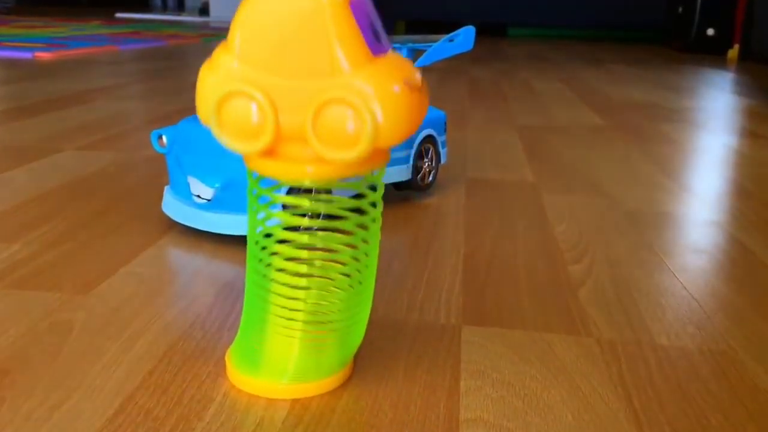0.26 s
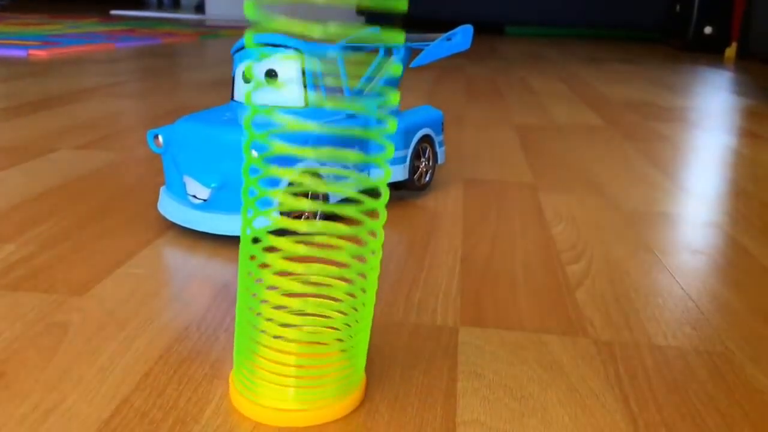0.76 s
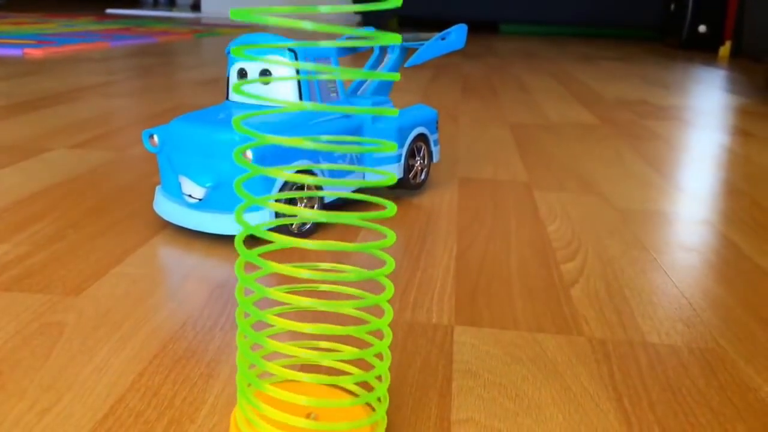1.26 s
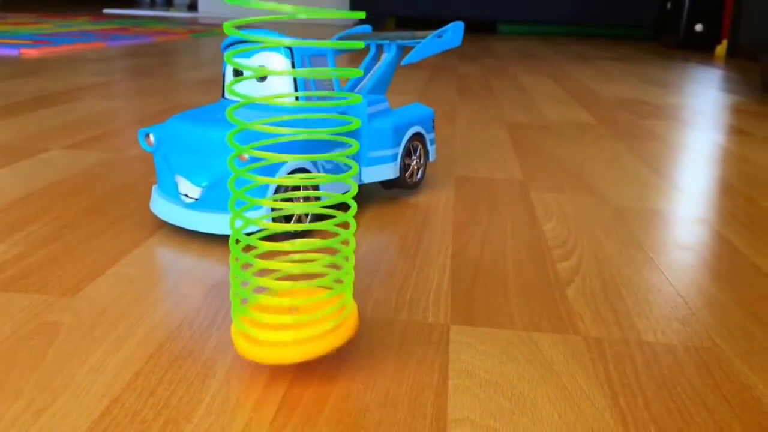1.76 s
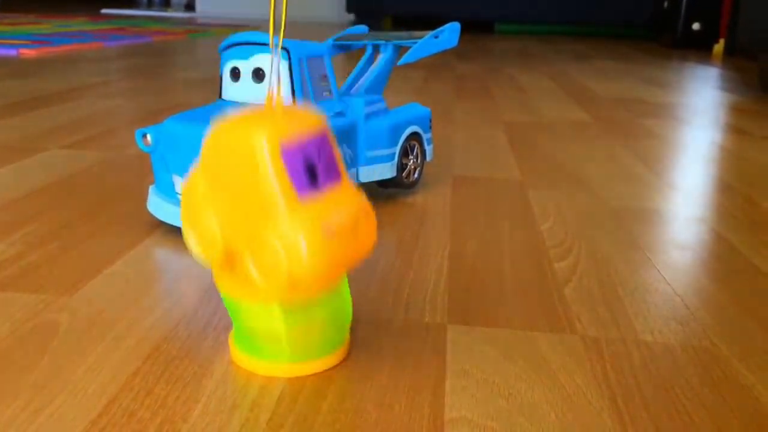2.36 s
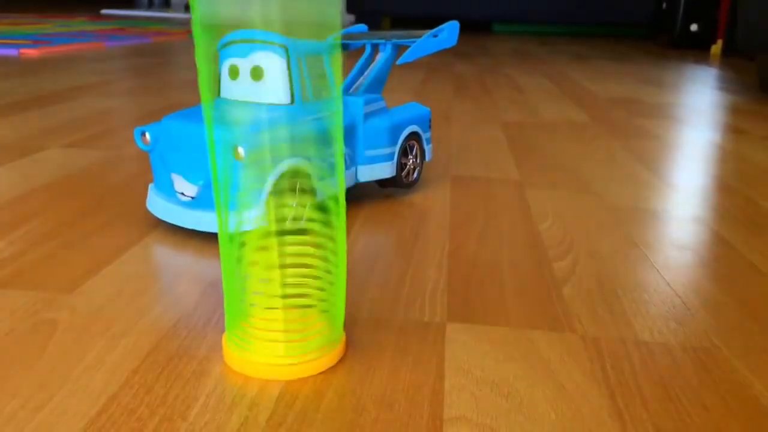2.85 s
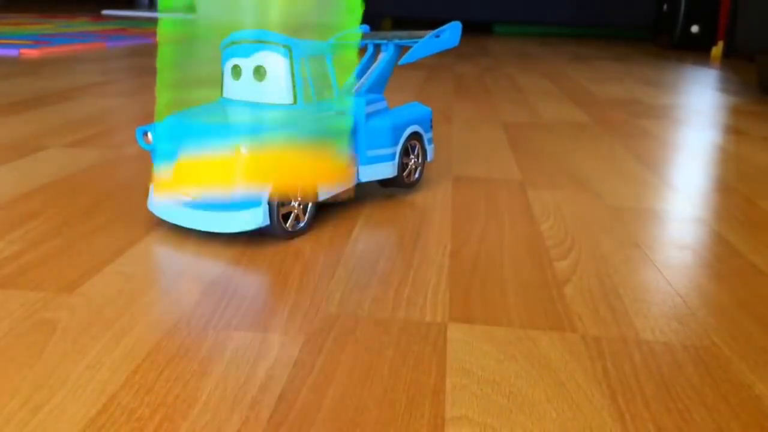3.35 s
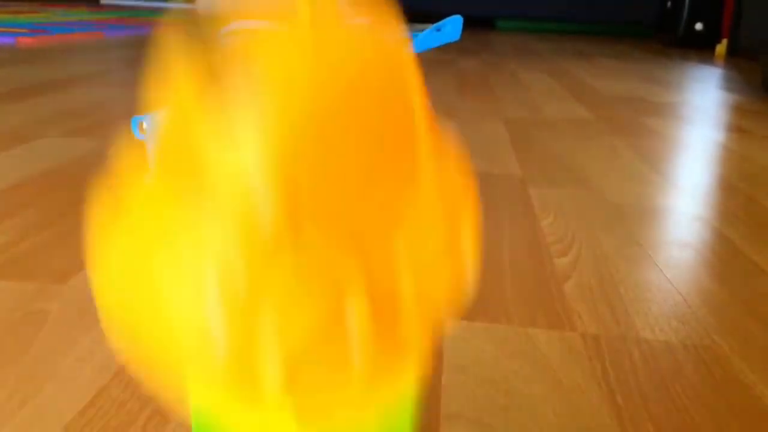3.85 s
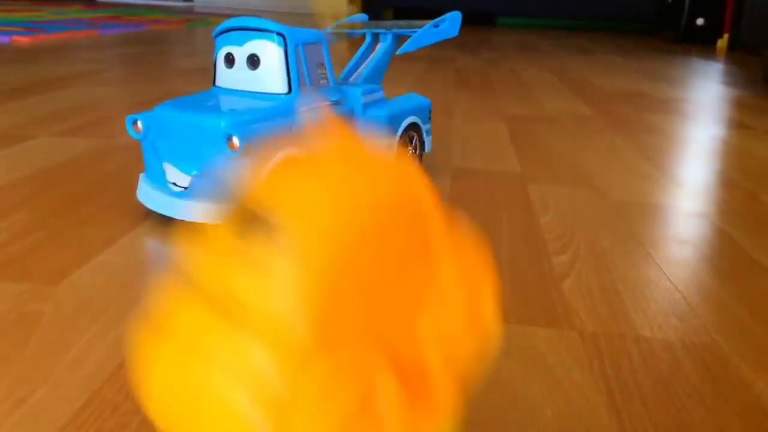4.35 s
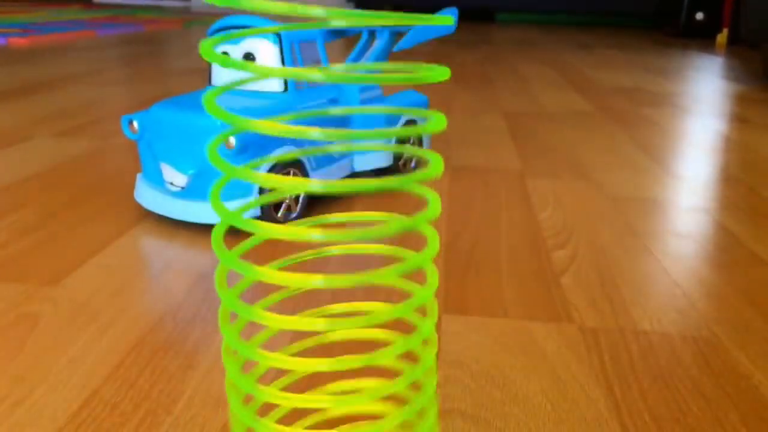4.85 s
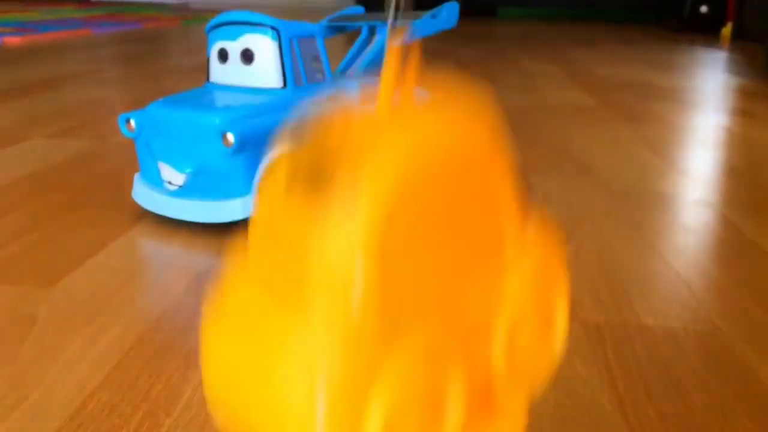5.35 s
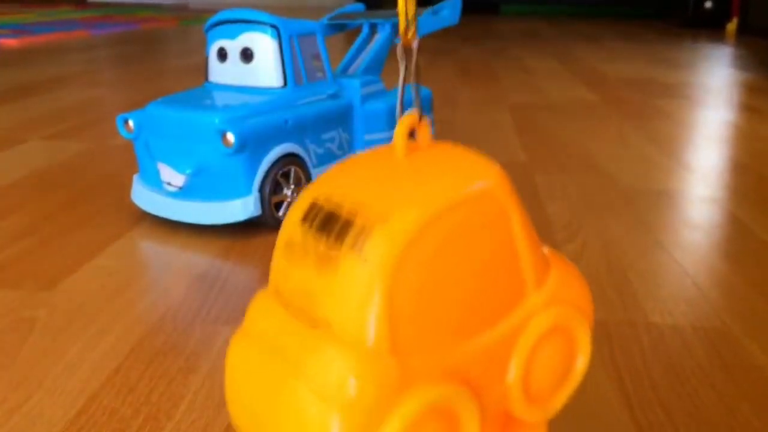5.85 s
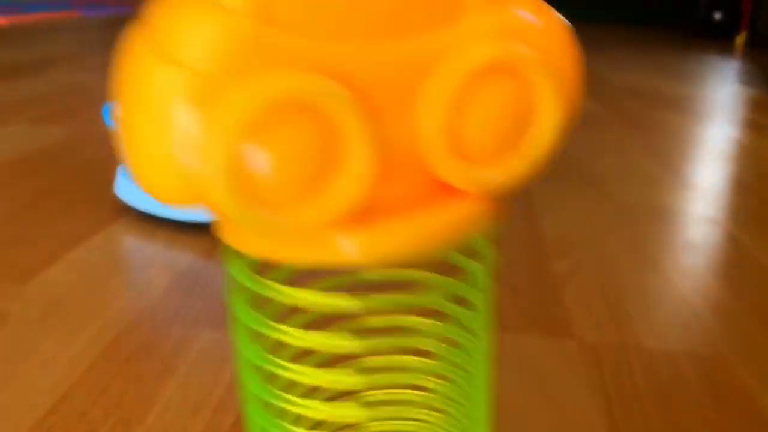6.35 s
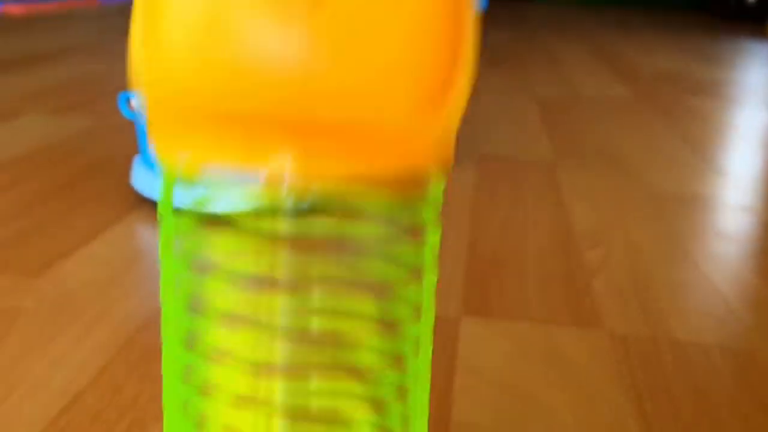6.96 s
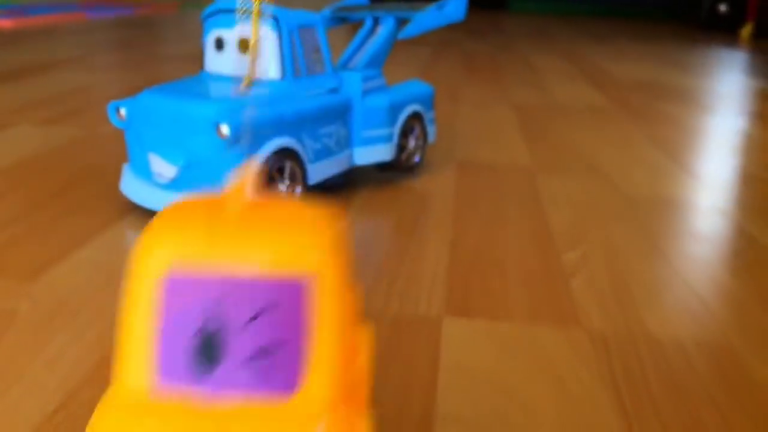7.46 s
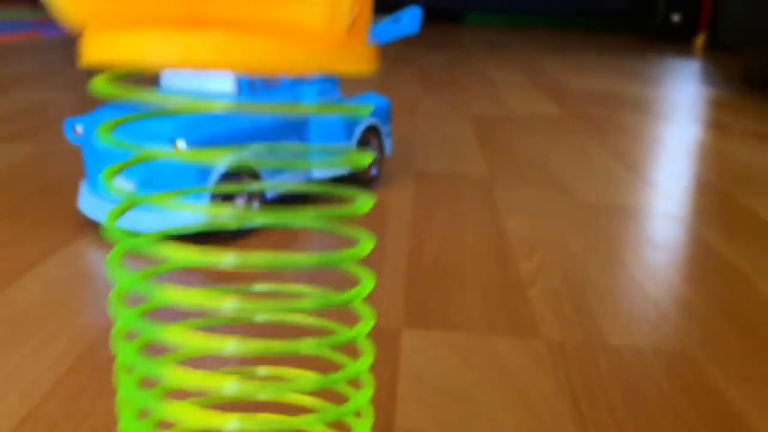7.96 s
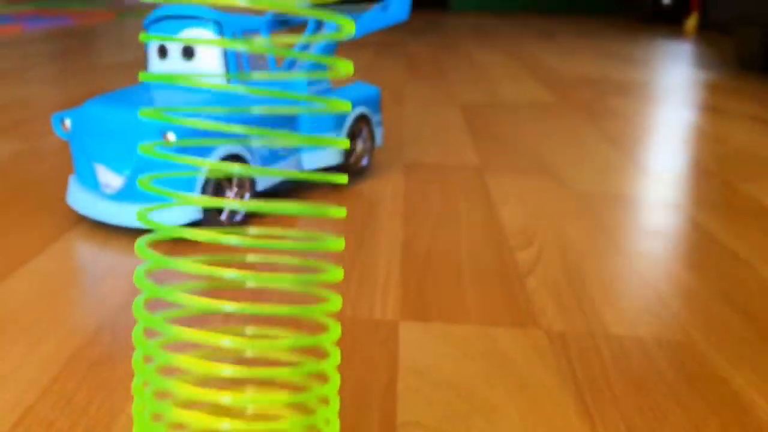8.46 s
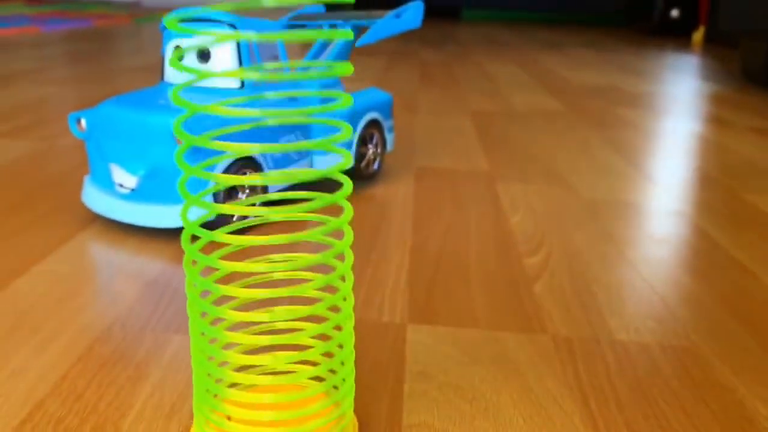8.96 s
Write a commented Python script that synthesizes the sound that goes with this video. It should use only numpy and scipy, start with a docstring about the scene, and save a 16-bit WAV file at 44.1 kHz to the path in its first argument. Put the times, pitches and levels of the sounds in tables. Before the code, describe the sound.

A plastic spring toy bounces, its coils rattling softly apart and clacking shut with falling chirps over a low room hum.

```python
"""Spring toy over a wooden floor

Indoors, one microphone close to a plastic spring toy with a hollow car-shaped top, bounced on a string.
The coils peel apart in a soft rattle and clack shut; each contact runs down the spring as a falling
chirp, and the wire hook ticks in its loop. Behind it are a low hum and faint, distant twittering."""
import sys
import numpy as np
from scipy import signal
from scipy.fft import rfft, irfft, next_fast_len
from scipy.io import wavfile
from scipy.ndimage import uniform_filter1d

SR = 44100
rng = np.random.default_rng(int(sys.argv[2]) if len(sys.argv) > 2 else 0)


def store_pcm(level_fs):
    """Save levels as 16-bit WAV."""
    pcm = np.round(np.clip(level_fs, -1, 1) * 32767).astype(np.int16)
    wavfile.write(sys.argv[1], SR, np.atleast_2d(pcm).T)


N = 406602

# room tone, low rumble: (frequency [Hz], relative density [dB])
RUMBLE_SPECTRUM = [(18, -33.5), (30, -21), (45, -8.5), (65, 0.5), (85, -3.5), (110, -3.5), (150, -12),
                   (210, -24), (400, -59.5)]
# room tone, soft hiss: (frequency [Hz], relative density [dB])
HISS_SPECTRUM = [(88, -20.5), (150, -0.5), (226, -8), (309, -4.5), (348, -20), (414, -7.5), (589, -20.5),
                 (649, -19.5), (1140, -22), (3040, -40), (4080, -44), (4950, -45), (16000, -62.5)]
# the spring stretching: (peak time [s], rise [s], fall [s], chirp [dB], scrape [dB], scrape lag [s])
STRETCHES = [(1.0, 0.51, 0.41, -41, -54.5, 0.16), (3.05, 0.15, 0.13, -45, -66, 0.0054),
             (6.82, 0.48, 0.29, -43.5, -55.5, 0.057), (8.655, 0.32, 0.35, -31, -47, 0.0024)]
# bending wave in the coils: (frequency [Hz], relative level [dB])
BENDING_SPECTRUM = [(100, -35), (220, -18), (320, -9.5), (450, -1.5), (650, 4), (950, -3.5), (1400, -9.5),
                    (1950, -21), (3000, -32.5), (6000, -64.5)]
# narrower band in which the stretched spring rings: (frequency [Hz], relative level [dB])
STRETCHED_BAND = [(200, -8), (350, -0.5), (520, 1.5), (720, -2), (1000, -1.5), (1300, -3), (1700, -6.5),
                  (3000, -11)]
# coils rubbing: (frequency [Hz], relative level [dB])
RUB_SPECTRUM = [(700, -17), (1800, -1.5), (2400, 0.5), (2800, 0.5), (3250, 1.5), (4350, 2.5), (4950, -4),
                (5700, -2), (7000, -0.5), (9200, 0), (10400, -9), (11800, -3.5), (16000, -15)]
# single hard contacts between coils: (time [s], tick level [dB], chirp level [dB])
COIL_CLACKS = [(1.29, -41.5, -50), (2.0596, -26, -22.5), (2.0764, -24.5, -20.5), (2.0828, -24, -22.5),
               (2.09, -30, -34), (2.13, -35.5, -21.5), (2.3015, -44, -52), (2.4606, -36.5, -32),
               (2.5293, -33, -26.5), (3.1352, -45, -44.5), (3.7977, -9.5, -9), (3.8062, -10.5, -14),
               (3.8089, -4, -12), (3.8511, -24.5, -17.5), (3.996, -28.5, -38), (4.037, -20.5, -16),
               (4.0535, -16.5, -15.5), (4.0632, -17.5, -21), (4.0705, -17.5, -7.5), (4.7017, -30, -24.5),
               (4.7174, -42, -27), (5.222, -17.5, -16), (5.2405, -24.5, -25), (5.2506, -28, -18.5),
               (5.2561, -18.5, -16.5), (5.287, -33.5, -23.5), (5.3045, -25, -24), (5.3102, -40, -23.5),
               (5.472, -39, -28), (5.544, -20, -22.5), (5.5888, -24, -21.5), (6.4842, -45, -41),
               (6.7004, -62, -48), (7.0264, -38, -39.5), (7.3315, -28.5, -23.5), (7.3535, -28.5, -21),
               (7.552, -54, -37), (7.57, -50, -43), (7.765, -59, -34), (8.4034, -53, -36.5)]
# tick of a hard contact: (frequency [Hz], relative level [dB])
TICK_SPECTRUM = [(700, -25), (1800, -0.5), (2800, -2.5), (3900, 2.5), (5200, -3.5), (7000, -5.5),
                 (9200, -4), (10400, -10), (12000, -4.5), (16000, -14)]
# modes of the hollow top: (frequency [Hz], relative level [dB], t60 [s])
TOP_MODES = [(269, -12.5, 0.15), (663, -3, .06), (736, -8.5, .045), (956, -6, .03), (1235, -2.5, 0.014),
             (1364, -3, 0.026), (1470, 1, 0.022), (1650, -6.5, 0.038), (2220, -3.5, 0.025),
             (2440, -5.5, 0.015), (2770, -6, 0.014), (3210, -4, 0.026), (3550, 1.5, 0.016),
             (3950, -0.5, 0.012)]
# distant twittering: (time [s], length [s], pitch [Hz], relative level [dB])
TWITTERS = [(1.519, 0.087, 3500, -64), (2.678, 0.04, 3420, -63), (3.304, 0.066, 4030, -56.5),
            (3.66, 0.067, 4210, -56), (5.112, 0.079, 3950, -65.5), (5.741, 0.11, 3730, -65),
            (6.201, 0.094, 4170, -59.5), (7.97, .16, 4000, -63)]
# runs of coils closing: (peak time [s], rise [s], fall [s], chirp level [dB], tick level [dB])
CLOSING_RUNS = [(2.11, 0.046, 0.19, -41, -50.5), (2.33, 0.14, 0.19, -49.5, -56.5),
                (2.538, 0.077, 0.054, -29, -40.5), (3.811, 0.0092, 0.12, -34, -26.5),
                (4.009, 0.028, 0.024, -33, -41), (4.045, 0.024, .03, -21, -21.5),
                (4.077, 0.02, 0.019, -14.5, -18), (4.444, 0.04, 0.098, -39, -42),
                (4.652, .025, 0.023, -33.5, -52), (4.917, 0.076, .028, -42, -46),
                (5.263, .012, 0.068, -35.5, -50.5), (5.512, 0.062, 0.064, -30.5, -43),
                (5.546, 0.013, 0.02, -24, -29.5), (5.589, 0.038, 0.02, -21, -38),
                (7.125, 0.14, 0.079, -43, -49.5), (7.331, .016, 0.018, -25, -33),
                (7.354, 0.013, 0.023, -19.5, -39)]
# the wire hook knocking in its loop: (time [s], relative level [dB])
HOOK_KNOCKS = [(4.1042, -23), (4.112, -21), (4.128, -32), (4.1339, -24.5), (4.1652, -26), (4.1806, -35),
               (4.4427, -19), (4.457, -30), (5.6066, -39), (5.8228, -46)]
# modes of hook and loop: (frequency [Hz], relative level [dB], t60 [s])
HOOK_MODES = [(3580, -5, .008), (4094, -2, 0.022), (4400, -0.5, 0.012), (5400, -7.5, 0.0072),
              (6570, -2.5, 0.0074), (6590, -2.5, 0.0094), (9270, -7.5, 0.007), (11600, -20, .008)]
# the hook jiggling after a bounce: (peak time [s], rise [s], fall [s], level [dB])
HOOK_JIGGLES = [(4.184, 0.033, 0.096, -44), (4.31, 0.028, 0.2, -51.5), (5.665, 0.016, 0.016, -39),
                (7.385, 0.022, 0.052, -47), (7.491, .02, .02, -48.5)]
# wire sliding in its loop: (frequency [Hz], relative level [dB])
SLIDE_SPECTRUM = [(1500, -35), (3200, -21), (3900, 6), (4500, 2), (5200, -5), (6500, -5.5), (9000, -12.5),
                  (16000, -26)]
# decay of the room: (frequency [Hz], t60 [s])
ROOM_DECAY = [(150, 1.0), (600, 0.44), (2000, 0.7), (5000, 0.75), (10000, 0.73), (16000, 1.2)]
# reverberation at the microphone: (frequency [Hz], gain [dB])
ROOM_GAIN = [(150, -12), (600, -11.5), (2000, -13.5), (5000, -17.5), (10000, -17.5), (16000, -41)]
ROUNDED, POINTED = 2.44, 1.22  # exponents that shape a swell


def amp(db):
    """Turns dB into gain."""
    return 10 ** (np.asarray(db) / 20)


def unit_rms(x):
    """Scales to rms 1."""
    return x / np.sqrt(np.mean(x ** 2) + 1e-20)


def with_energy(x, energy):
    """Scales a blow so that its squared samples sum to energy."""
    return x * np.sqrt(energy / np.sum(x ** 2))


def curve_at(points, hz):
    """Joins points by straight lines over log frequency."""
    point_hz, value = np.transpose(points)
    return np.interp(np.log(hz + 1), np.log(point_hz + 1), value)


def add(mix, s, sound):
    """Mixes a sound in at time s."""
    part = mix[round(s * SR):][:len(sound)]
    part += sound[:len(part)]


def coloured(x, spectrum):
    """Filters x by a curve of (frequency [Hz], gain [dB])."""
    size = next_fast_len(len(x))
    gain = amp(curve_at(spectrum, np.fft.rfftfreq(size, 1 / SR)))
    return irfft(rfft(x, size) * gain, size)[:len(x)]


def drift(per_s):
    """A random wander of rms 1."""
    knots = rng.standard_normal(2 ** 14)
    return unit_rms(np.interp(np.arange(N) / SR * per_s, np.arange(len(knots)), knots))


def swell(peak, rise, fall, shape, edge_db=-23):
    """A gain of 1 at the peak, passing edge_db one rise before it and one fall after."""
    start, out = max(peak - 2 * rise, 0), np.zeros(N)
    t = np.arange(start, peak + 2 * fall, 1 / SR) - peak
    add(out, start, amp(edge_db * np.maximum(-t / rise, t / fall) ** shape))
    return out


def room_tone(hum_hz=74.7, waver=.38, hum_db=-42.0, rumble_db=-41.5, hiss_db=-46.5):
    """The bed of the room: a wavering hum in low rumble, under soft hiss."""
    hum_gain = np.sqrt(2) * (1 + waver * drift(3.3))
    hum = hum_gain * np.sin(2 * np.pi * hum_hz * np.arange(N) / SR + .5 * drift(4.6))
    rumble = unit_rms(coloured(rng.standard_normal(N), RUMBLE_SPECTRUM))
    hiss = unit_rms(coloured(rng.standard_normal(N), HISS_SPECTRUM))
    return amp(hum_db) * hum + amp(rumble_db) * rumble + amp(hiss_db) * hiss


def coil_chirp(hardness_db=0, sweep_s=0.001309, echo_s=.0068, echo_db=-10, ripple_db=3.0):
    """A bending wave runs down the spring, treble first: delay ~ 1 / sqrt(frequency)."""
    hz = np.fft.rfftfreq(4096, 1 / SR)
    path, pitch, round_trip = np.exp(rng.standard_normal(3) * [.15, .08, .25])
    pitch *= np.exp(.015 * hardness_db)  # a harder contact is briefer, so higher
    phase = 4 * np.pi * sweep_s * path * np.sqrt(hz * 1000)
    # each return from the spring's end is more drawn out
    echo = amp(echo_db) * np.exp(-1j * (phase + 2 * np.pi * hz * echo_s * round_trip))
    ripple = np.interp(hz, np.arange(100) * 220, rng.standard_normal(100))
    magnitude = amp(curve_at(BENDING_SPECTRUM, hz / pitch) + ripple_db * ripple)
    return with_energy(irfft(magnitude * np.exp(-1j * phase) / (1 - echo)), 176)


def tick(spectrum, rise_s=0.00013, decay_s=0.00069, tail_s=.004, tail_db=-16):
    """A hard contact: a snap of noise with a brief ringing tail."""
    t = np.arange(1024) / SR
    envelope = (np.exp(-t / decay_s) + amp(tail_db) * np.exp(-t / tail_s)) * (1 - np.exp(-t / rise_s))
    burst = np.pad(envelope * rng.standard_normal(len(t)), (8, 120))
    return with_energy(coloured(burst, spectrum), 88)


def coil_contacts(per_s, spread_db, spectrum, tick_spread_db, variants=24):
    """Coils touching at random: a stream of chirps and one of ticks, each of rms 1."""
    chance, variant = rng.random(N), rng.integers(0, variants, N)
    force, hardness = np.clip(rng.standard_normal((2, N)), -2, 2)
    sounds = [(coil_chirp(), tick(spectrum)) for _ in range(variants)]
    chirps, ticks = np.zeros((2, N))
    for i in np.flatnonzero(chance < per_s / SR):
        wave, click = sounds[variant[i]]
        add(chirps, i / SR, amp(spread_db * force[i]) * wave)
        add(ticks, i / SR, amp(spread_db * force[i] + tick_spread_db * hardness[i]) * click)
    return unit_rms(chirps), unit_rms(ticks)


def wandering_resonances(x, depth_db=3.4):
    """Hollow resonances come and go as the contact travels along the spring."""
    bands = signal.stft(x, nperseg=512)[2]
    patches = uniform_filter1d(rng.standard_normal(bands.shape), size=7, axis=0)
    patches = uniform_filter1d(patches, size=28, axis=1)
    return signal.istft(bands * amp(depth_db * unit_rms(patches)), nperseg=512)[1][:N]


def spring_stretching(rub_db=-8, fizz_db=-7, fizz_growth=1.15):
    """The coils peel apart one by one; their rubbing peaks later and brightens with tension."""
    chirps, ticks = coil_contacts(per_s=520, spread_db=1.5, spectrum=RUB_SPECTRUM, tick_spread_db=2.5)
    chirps = unit_rms(coloured(chirps, STRETCHED_BAND))
    rub = unit_rms(coloured(rng.standard_normal(N), RUB_SPECTRUM))
    friction = wandering_resonances(ticks + amp(rub_db) * rub)
    low = coloured(friction, [(6200, -1.5), (7000, -11), (8500, -54)])
    scrape, fizz = unit_rms(low), unit_rms(friction - low)
    out = np.zeros(N)
    for peak, rise, fall, chirp_db, scrape_db, lag in STRETCHES:
        tension = swell(peak + lag, rise + lag, fall - lag, ROUNDED)
        out += amp(chirp_db) * swell(peak, rise, fall, ROUNDED) * chirps
        out += amp(scrape_db) * (tension * scrape + amp(fizz_db) * tension ** fizz_growth * fizz)
    return out


def coil_snaps(per_s=22, tick_trim_db=-7, chirp_trim_db=-12):
    """Now and then during a stretch a coil sticks and snaps free."""
    chirps, ticks = coil_contacts(per_s, spread_db=-0.5, spectrum=RUB_SPECTRUM,
                                  tick_spread_db=2.0, variants=8)
    out = np.zeros(N)
    for peak, rise, fall, chirp_db, scrape_db, lag in STRETCHES:
        tension = swell(peak + lag, rise + lag, fall - lag, ROUNDED)
        out += tension * (amp(scrape_db + tick_trim_db) * ticks + amp(chirp_db + chirp_trim_db) * chirps)
    return out


def ring(modes, detune):
    """Each blow rings the modes in a new mixture."""
    t, out = np.arange(2048) / SR, np.zeros(2048)
    for hz, db, t60 in modes:
        weight = rng.choice([-1, 1]) * rng.uniform(0.38, 1)
        out += weight * amp(db - 60 * t / t60) * np.sin(2 * np.pi * hz * rng.normal(1, detune) * t)
    return with_energy(out, 88)


def coil_clacks(hardness_offset_db=5, slam_db=-9.5, top_db=-12, top_growth=1.4):
    """Coils clack shut: a tick, its chirp, and the hollow top's ring, which grows with the force."""
    out = np.zeros(N)
    for s, tick_db, chirp_db in COIL_CLACKS:
        force_db = (tick_db + chirp_db) / 2
        add(out, s, amp(tick_db) * tick(TICK_SPECTRUM))
        add(out, s, amp(chirp_db) * coil_chirp(tick_db - chirp_db + hardness_offset_db))
        add(out, s, amp(top_db + top_growth * (force_db - slam_db)) * ring(TOP_MODES, detune=0.0097))
    return out


def distant_twitters(glide=0.075, trill_hz=42, trill=.05, rasp=0.051):
    """Far from the microphone, quick raspy trills that fall a little in pitch."""
    flutter = trill * np.sin(2 * np.pi * trill_hz * np.arange(N) / SR) + rasp * drift(1500)
    out = np.zeros(N)
    for s, length, hz, db in TWITTERS:
        progress = np.linspace(0, 1, round(length * SR))
        pitch = hz * (1 + glide * (.5 - progress) + flutter[round(s * SR):][:len(progress)])
        envelope = np.sqrt(2 * abs(np.sin(np.pi * progress)))
        add(out, s, amp(db) * envelope * np.sin(2 * np.pi * np.cumsum(pitch) / SR))
    return out


def spring_closing(top_db=-6, cavity_hz=675, cavity_q=9, cavity_db=-5):
    """Crowded contacts swell and stop; the hollow top and the air inside it ring along."""
    chirps, ticks = coil_contacts(per_s=1200, spread_db=2.5, spectrum=TICK_SPECTRUM, tick_spread_db=0)
    top = signal.oaconvolve(ticks, ring(TOP_MODES, detune=0.015))[:N]
    top = coloured(top, [(700, 2.5), (1500, -8.5), (2500, -15), (4000, -31.5)])
    cavity = signal.lfilter(*signal.iirpeak(cavity_hz, cavity_q, SR), chirps)
    body = unit_rms(chirps + amp(top_db) * unit_rms(top) + amp(cavity_db) * unit_rms(cavity))
    return sum(swell(peak, rise, fall, POINTED) * (amp(chirp_db) * body + amp(tick_db) * ticks)
               for peak, rise, fall, chirp_db, tick_db in CLOSING_RUNS)


def slam_thud(s=3.8065, hz=128, db=-18, t60=.04):
    """The hardest slam also gives a low thud."""
    out, t = np.zeros(N), np.arange(8192) / SR
    add(out, s, amp(db - 60 * t / t60) * np.sin(2 * np.pi * hz * t))
    return out


def hook_knocks(ring_db=-1, click_db=-7, chatter_s=0.0053, chatter_db=-10):
    """The wire clicks in its loop, rings briefly and chatters."""
    out = np.zeros(N)
    for s, db in HOOK_KNOCKS:
        add(out, s, amp(db + ring_db) * ring(HOOK_MODES, detune=0.036))
        add(out, s, amp(db + click_db) * tick(TICK_SPECTRUM))
        for shift in chatter_s * rng.uniform(-0.92, 2, size=3):
            add(out, s + shift, amp(db + chatter_db) * rng.random() * ring(HOOK_MODES, detune=0.035))
    return out


def hook_jiggle(per_s=700):
    """After a bounce the loose wire makes many tiny touches on its loop."""
    touches = rng.standard_normal(N) * (rng.random(N) < per_s / SR)
    scratches = signal.oaconvolve(touches, rng.standard_normal(64))[:N]
    wire = unit_rms(coloured(scratches, SLIDE_SPECTRUM))
    return wire * sum(amp(db) * swell(peak, rise, fall, POINTED) for peak, rise, fall, db in HOOK_JIGGLES)


def room_reverb(x, per_s=4000, build_s=0.0026):
    """Sparse reflections off floor and walls, each band dying at its own speed."""
    taps = rng.standard_normal(SR) * (rng.random(SR) < per_s / SR)
    taps *= 1 - np.exp(-np.arange(SR) / SR / build_s)
    hz, t, bands = signal.stft(taps, SR, nperseg=256)
    decay = amp(-60 * t / curve_at(ROOM_DECAY, hz)[:, None])
    tail = signal.istft(bands * decay, SR, nperseg=256)[1]
    return signal.fftconvolve(x, coloured(tail / np.linalg.norm(tail), ROOM_GAIN))[:N]


def scene(far_direct_db=-8, far_room_db=10, hook_room_db=-6):
    """In mono: the toy is close and fairly dry; the distant twitters carry more of the room."""
    toy = spring_stretching() + coil_snaps() + spring_closing() + coil_clacks() + slam_thud()
    wire = hook_knocks() + hook_jiggle()
    far = distant_twitters()
    reverb = room_reverb(toy + amp(hook_room_db) * wire + amp(far_room_db) * far)
    return (toy + wire + amp(far_direct_db) * far + reverb + room_tone())[None]


def record(dry):
    """The hardest clack overloads the microphone; the highest treble is then cut off."""
    lowpass = signal.firwin(511, cutoff=16250, window=("kaiser", 9), fs=SR)
    return signal.oaconvolve(np.clip(dry, -1, 1), lowpass[None], "same")


dry = scene()
out = record(dry)
store_pcm(out)
```